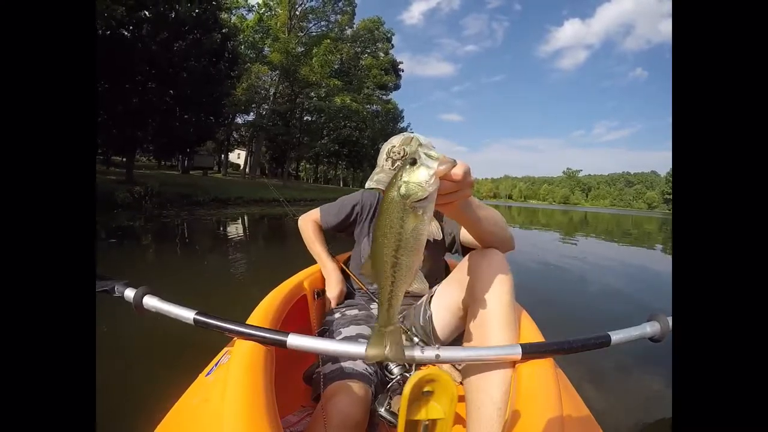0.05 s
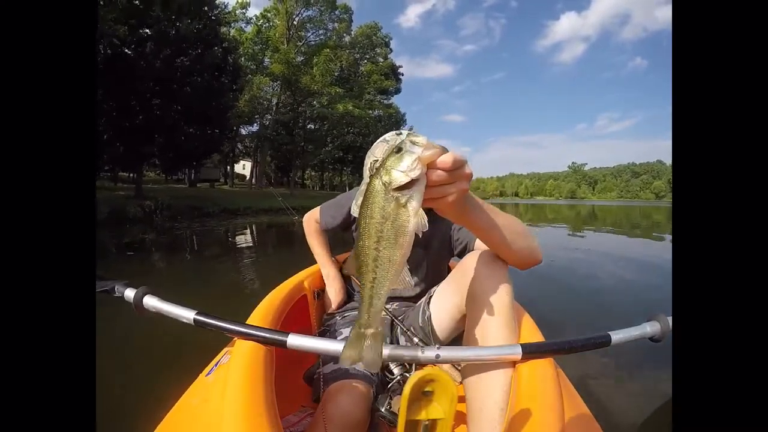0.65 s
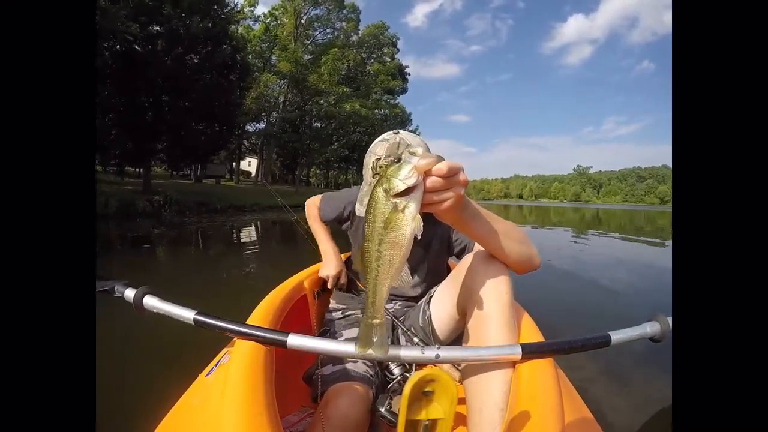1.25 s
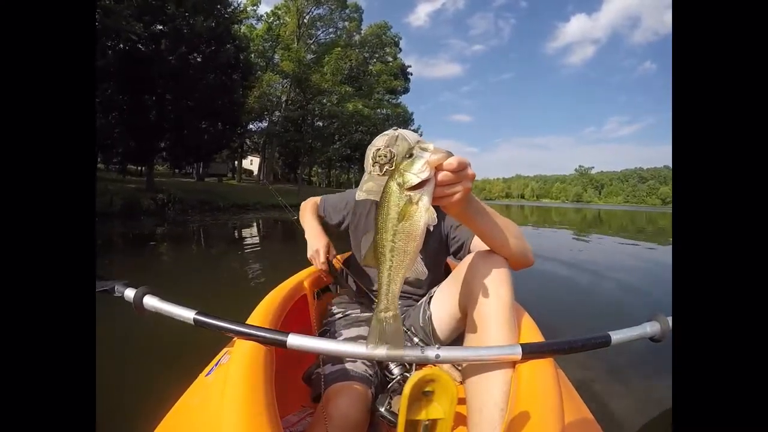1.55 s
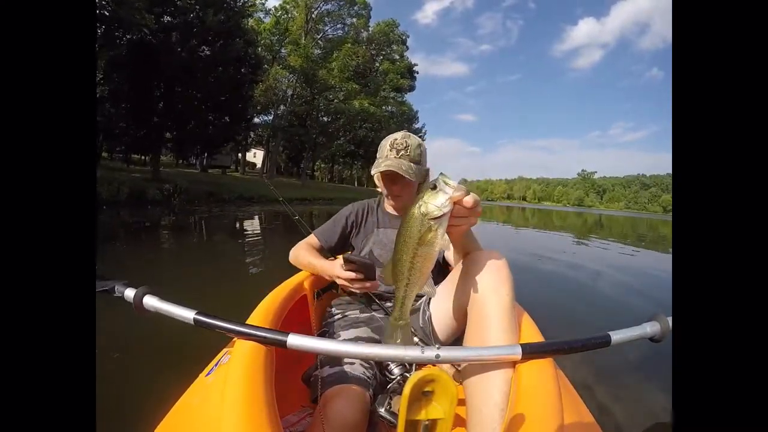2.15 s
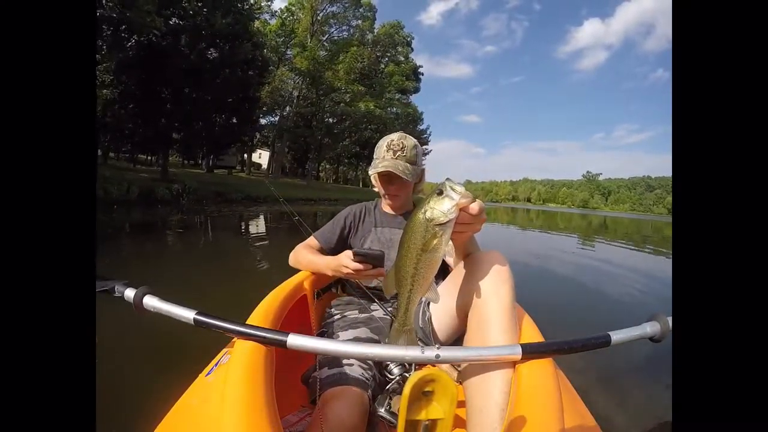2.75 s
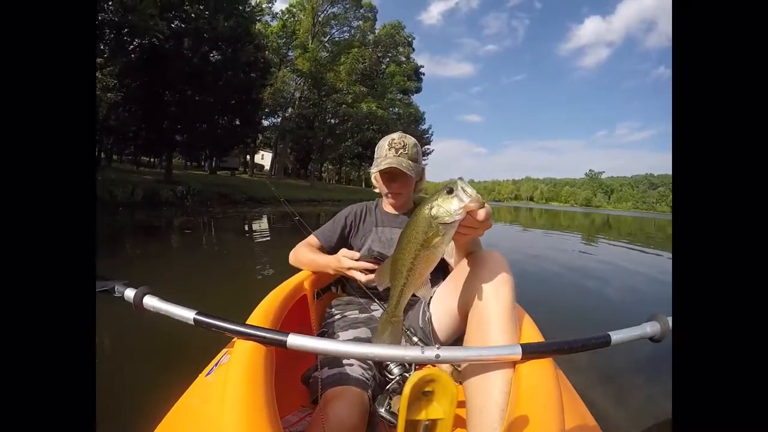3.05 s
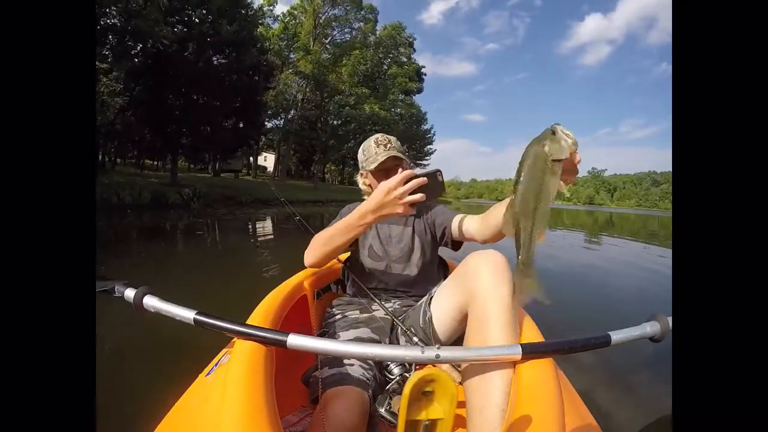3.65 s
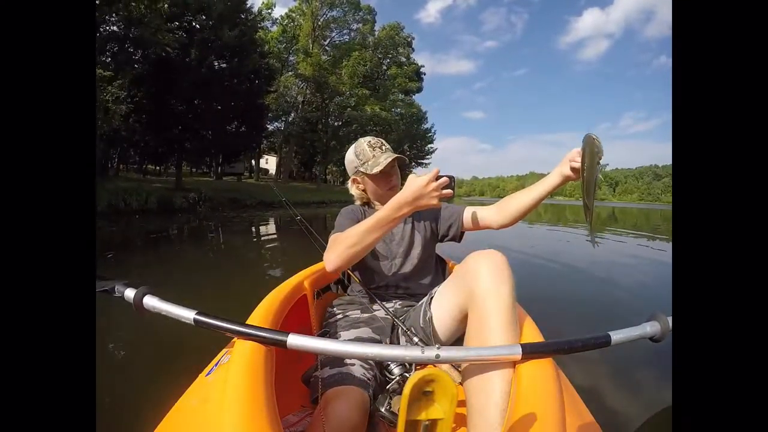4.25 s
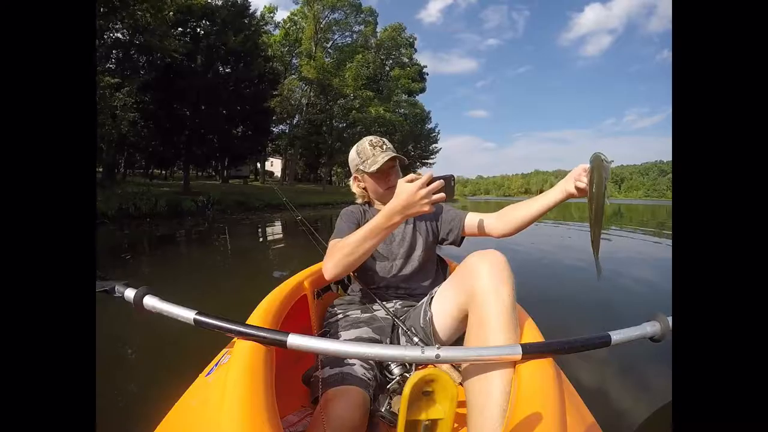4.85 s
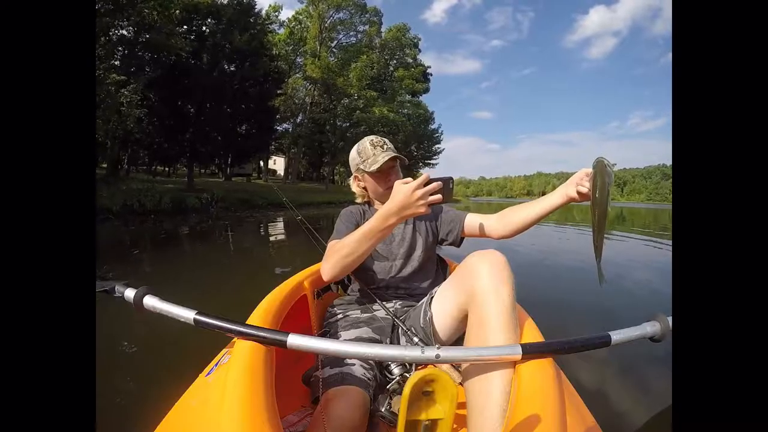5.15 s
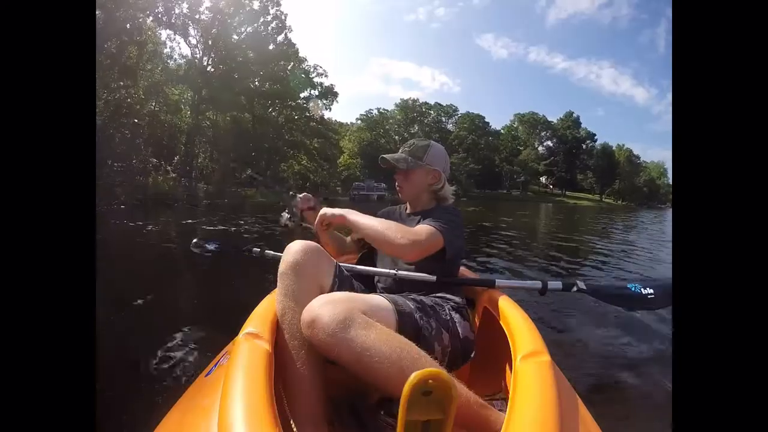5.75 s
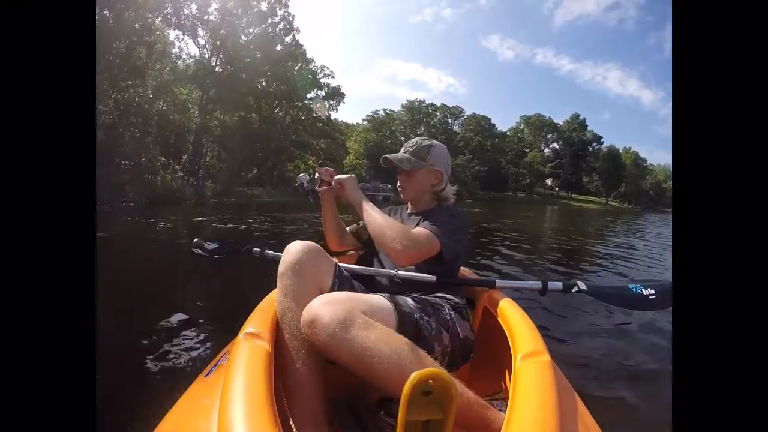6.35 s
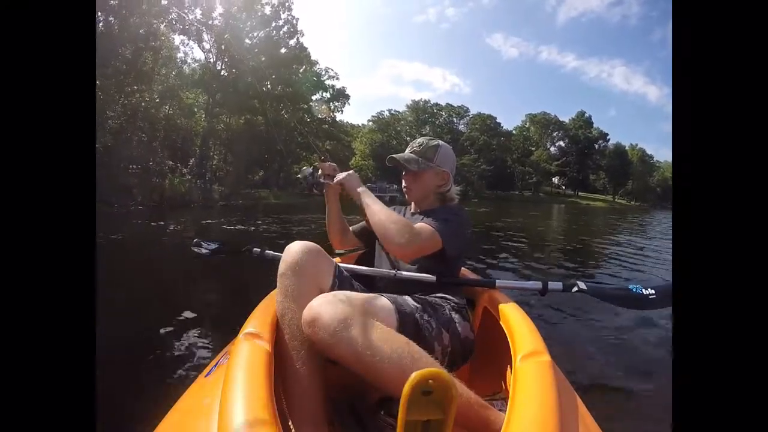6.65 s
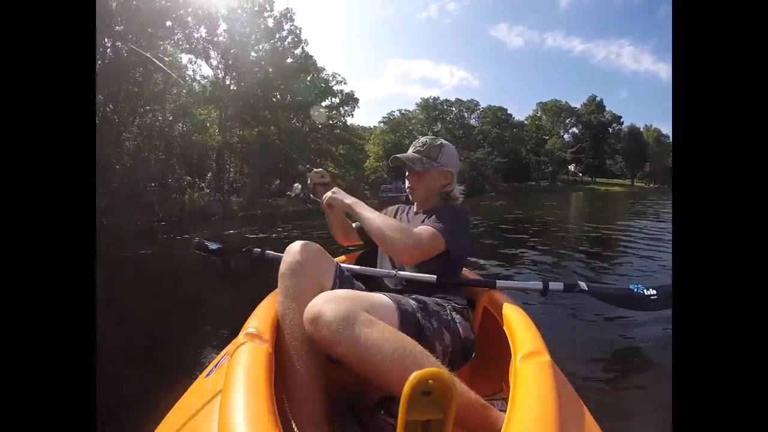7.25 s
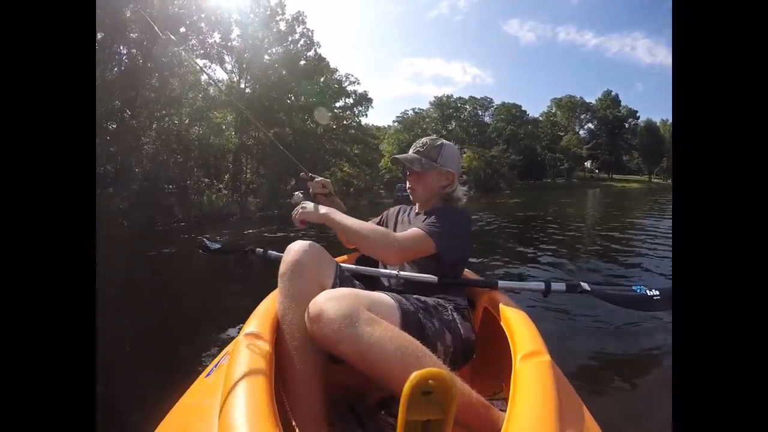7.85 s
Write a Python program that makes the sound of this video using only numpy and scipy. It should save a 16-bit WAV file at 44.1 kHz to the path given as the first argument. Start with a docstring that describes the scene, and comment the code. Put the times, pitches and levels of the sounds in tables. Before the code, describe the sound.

Close by, the seat of a plastic kayak creaks in small clicking slips while fishing gear knocks irregularly on the hollow shell. A microphone fixed to the hull picks up the low rumble of the rocking boat on a pond. After a quieter stretch, distant cicadas grow louder, and a cluster of heavy, booming knocks comes near the end.

```python
"""On a pond, in a plastic kayak, one microphone fixed to the hull. Close by, someone handles a fish and
fishing gear: the seat creaks in small slips and gear knocks on the shell, loudest near the end.
Both reach the microphone as bending waves, which bring the treble first and the boom last.
The rocking boat rumbles underneath and the far shore hisses. There are two scenes: the cicadas on the
shore are faint in the first, then after a cut at 5.6 s they are louder and swelling."""
import sys
import numpy as np
from scipy import signal
from scipy.fft import rfft, irfft, next_fast_len
from scipy.io import wavfile
from scipy.ndimage import uniform_filter1d, minimum_filter1d

SR = 44100
rng = np.random.default_rng(int(sys.argv[2]) if len(sys.argv) > 2 else 0)


def wav_out(sig):
    """Save sig, one row per channel (or a flat mono array), as 16-bit PCM at SR to the path in sys.argv[1]."""
    wavfile.write(sys.argv[1], SR, np.round(np.clip(np.atleast_2d(sig).T, -1, 1) * 32767).astype(np.int16))


N = 357287
TIME = np.arange(N) / SR
HZ = np.fft.rfftfreq(N, 1 / SR)

# registers of the shell, in the order heave, boom, thud, clack, click:
# (low edge [Hz], high edge [Hz], share of scattered waves [0-1], build-up [s], their t60 [s], gain [dB])
REGISTERS = [(18, 65, 0.1, .004, .15, 3), (60, 130, 0.48, 0.0026, 0.12, 3),
             (132, 300, 0.48, 0.0019, 0.21, -0.5), (350, 1215, 0.8, 0.00052, 0.1, -9),
             (1665, 4150, 0.81, 0.00083, 0.028, -5)]
# creaks of the seat, each a scrape with a run of small slips:
# (start [s], length [s], level [dB], swell [dB/s], slip rate [1/s])
CREAKS = [(0.017, 0.18, -49.5, -19, 16.9), (0.272, 0.18, -52.5, -9, 26.7), (0.525, 0.49, -55.5, -5.5, 7.7),
          (1.125, 0.29, -53.5, 4, 22.8), (1.731, 0.08, -57.5, 28, 12), (1.823, 0.22, -51, 17, 54),
          (3.121, 0.14, -62.5, 20, 22), (5.749, 0.16, -62.5, -3, 12.5), (7.52, 0.13, -46, -68.5, 19)]


def amp(db):
    """Decibels to gain."""
    return 10 ** (np.asarray(db) / 20)


def unit_rms(x):
    """Scales to rms 1."""
    return x / np.sqrt(np.mean(x ** 2) + 1e-20)


def add(mix, start_s, sound):
    """Adds a sound into the mix at start_s."""
    part = mix[max(round(start_s * SR), 0):][:len(sound)]
    part += sound[:len(part)]


def noise(gain):
    """Noise of rms 1, shaped by a gain at each frequency of HZ."""
    size = next_fast_len(N)
    gain = np.interp(np.fft.rfftfreq(size, 1 / SR), HZ, gain)
    return unit_rms(irfft(rfft(rng.standard_normal(size)) * gain, size)[:N])


def spectrum(points):
    """Gain at each frequency from points of (frequency [Hz], level [dB])."""
    hz, db = np.transpose(points)
    return amp(np.interp(np.log(HZ + 1), np.log(hz), db))


def resonances(peaks):
    """Gain at each frequency from steep peaks of (centre [Hz], width [Hz], level [dB])."""
    return np.sqrt(sum((amp(db) / (1 + (2 * (HZ - hz) / width) ** 2)) ** 2 for hz, width, db in peaks))


def swell(start, end, rise_s, fall_s):
    """Envelope that rises to 1 at start, holds until end and dies away."""
    return np.exp(-np.maximum(start - TIME, 0) / rise_s - np.maximum(TIME - end, 0) / fall_s)


def hull_rumble(rocking_gain_db=2.5):
    """Under the microphone, water rocks the hull, and the low rumble swells briefly now and then."""
    # slow rocking of the boat: (time [s], level [dB])
    rocking_levels = [(0.0, -41), (0.81, -43.5), (1.06, -31), (1.37, -34), (1.53, -45), (1.76, -46),
                      (1.94, -36.5), (2.75, -53), (3.09, -51), (5.23, -56.5), (5.68, -57.5), (5.82, -47),
                      (6.99, -45.5), (7.45, -33), (7.53, -33), (7.6, -30), (7.81, -45), (8.1, -43)]
    # short swells of low rumble, several the booming tails of knocks: (time of the peak [s], level [dB])
    low_swells = [(0.049, -29.5), (0.45, -32.5), (0.87, -40), (1.3, -26.5), (1.82, -25), (2.0, -43),
                  (3.23, -31), (3.7, -43), (5.7, -35), (6.48, -30), (6.67, -40), (7.1, -19.5), (7.5, -15.5),
                  (7.72, -23)]
    # spectrum of the rumble: (frequency [Hz], level [dB])
    colour = [(10, -54), (18, 0), (35, 0.5), (70, -8), (105, -13.5), (135, -26), (190, -30), (270, -29),
              (380, -45), (650, -73), (1100, -110)]
    rocking = amp(np.interp(TIME, *np.transpose(rocking_levels)) + rocking_gain_db)
    swell_power = sum((amp(db) * swell(s, s, rise_s=0.03, fall_s=0.048)) ** 2 for s, db in low_swells)
    return noise(spectrum(colour)) * np.sqrt(rocking ** 2 + swell_power)


def shore_hiss(level_db=-60.5):
    """Far insects and leaves blend into a steady hiss."""
    # spectrum of the hiss: (frequency [Hz], level [dB])
    colour = [(100, 6), (250, -2.5), (450, -6.5), (800, -9), (1400, -13.5), (2700, -12.5), (6500, -13.5),
              (8500, -21), (13000, -25), (15300, -25)]
    return noise(spectrum(colour)) * amp(level_db)


def cicadas(throb_hz=8.5, speedup_hz_per_s=0.45, pause_at_s=7.793, throb_from_db=-71, deepening=0.87):
    """Across the water, a song throbs ever faster, and deeper when louder, beside a fluttering whine."""
    # cicada level in two scenes, faint, then after a cut at 5.6 s louder and swelling:
    # (time [s], song level [dB], whine level [dB])
    scene_levels = [(0, -68, -72.5), (3.2, -72, -71), (3.6, -74.5, -79), (5.6, -78.5, -90.5),
                    (5.649, -66.5, -73.5), (6.4, -65.5, -67), (8.1, -55.5, -56.5)]
    # resonances of the song and of the whine: (centre [Hz], width [Hz], level [dB])
    song_peaks = [(2600, 320, -2), (3347, 240, 1.5), (3843, 540, 4.5)]
    whine_peaks = [(4107, 95, 4.5), (4860, 600, -8), (5370, 810, -14), (6035, 110, 2), (5850, 690, -7),
                   (6440, 130, -3), (7670, 280, -12), (9700, 740, -23.5)]
    times, *levels = np.transpose(scene_levels)
    song_db, whine_db = (np.interp(TIME, times, level) for level in levels)
    t = TIME - pause_at_s  # the rate passes throb_hz at this pause
    throbs = throb_hz * t + speedup_hz_per_s * t ** 2 / 2
    pause = np.cos(np.pi * throbs) ** 6
    depth_db = deepening * np.maximum(song_db - throb_from_db, 0)
    song = noise(resonances(song_peaks)) * amp(song_db - depth_db * pause)
    whine = noise(resonances(whine_peaks))
    flutter_db = noise(1 / (1 + (HZ / 13) ** 4))  # 1 dB rms, mostly below 13 Hz
    return song + whine * amp(whine_db + flutter_db)


def shell_ring(low_hz, high_hz):
    """The plastic shell's modes ring in one register; the upper registers have steeper edges."""
    # modes of the shell: (frequency [Hz], level [dB], t60 [s])
    hull_modes = [(33.2, -8, 0.74), (48, -3, 0.27), (63.47, -4, 0.15), (68.9, 7.5, 0.63), (77.1, 10, 0.3),
                  (97.5, 1.5, 0.25), (110.4, 0.5, 0.43), (143, -7, 0.32), (168.7, -9.5, 0.44),
                  (203.4, -2, 0.13), (222.2, -12.5, 0.81), (254.3, -2, 0.15), (273.6, -1, 0.17),
                  (293, -4, 0.041), (405, -2, 0.053), (458, -5, 0.19), (562, -1, 0.11), (623, 10, 0.023),
                  (674, -4, 0.14), (773, 10, 0.032), (887, 10.5, 0.026), (1002, 1.5, 0.051),
                  (1105, -15, 0.08), (1333, -9, .06), (1768, -3, 0.053), (1883, 3.5, 0.029),
                  (2038, 6, 0.013), (2100, -17, 0.02), (2715, -8.5, 0.03), (3520, -15, 0.012),
                  (4340, -2.5, 0.0084)]
    modes = [mode for mode in hull_modes if low_hz <= mode[0] < high_hz]
    t = np.arange(int(SR * max(t60 for _, _, t60 in modes))) / SR
    ring = sum(amp(db - 60 * t / t60) * np.sin(2 * np.pi * hz * t) for hz, db, t60 in modes)
    order = 4 if low_hz > 250 else 1
    return signal.sosfilt(signal.butter(order, [low_hz, high_hz], "band", fs=SR, output="sos"), ring)


def seat_scrape(rings, grains_per_s=450, seat_hz=610, seat_t60=0.071):
    """Many tiny slips blur into a scrape through the shell, and the seat pan sings along."""
    pressure = np.zeros(N)
    for start, length, db, db_per_s, _ in CREAKS:
        level = amp(db + db_per_s * np.clip(TIME - start, 0, length))
        pressure += level * swell(start, start + length, rise_s=0.056, fall_s=0.028)
    grains = rng.choice([-1, 1], N) * (rng.random(N) < grains_per_s / SR)
    t = TIME[:SR // 5]
    seat = np.sin(2 * np.pi * seat_hz * t) * amp(-60 * t / seat_t60)
    boom, thud, clack, click = rings[1:]
    blend = [(boom, 4), (thud, -1), (clack, -5), (click, -15), (seat, -9)]  # (ring, level [dB])
    return pressure * sum(amp(db) * unit_rms(signal.oaconvolve(grains, ring)[:N]) for ring, db in blend)


def small_slips(over_db=5.5, hard_db=-1.5, click_hz=2100, jitter=0.029, spread_db=2.5, detune=0.061):
    """In a creak the seat sticks and slips at an almost even rate; gives rows for seat_slips."""
    rows = []
    for start, length, db, db_per_s, per_s in CREAKS:
        s = start
        for late, loud, high in rng.standard_normal(size=(40, 3)):
            if s < start + length:
                clack_db = db + over_db + db_per_s * (s - start) + spread_db * loud
                rows.append((s, clack_db, hard_db, click_hz * np.exp(detune * high)))
            s += np.exp(jitter * late) / per_s
    return rows


def favour(ring, hz, q):
    """The place of contact favours the modes near hz."""
    return signal.lfilter(*signal.iirpeak(hz, q, fs=SR), ring)


def strike(ring, register, db):
    """A direct push and a swelling burst of waves scattered round the shell excite one register."""
    _, _, share, rise_s, t60, gain_db = register
    t = np.arange(SR // 5) / SR
    drive = rng.standard_normal(len(t)) * (1 - np.exp(-t / rise_s)) * amp(-60 * t / t60)
    drive *= share / np.linalg.norm(drive)
    drive[0] += 1 - share  # the direct push
    sound = signal.fftconvolve(drive, ring)
    loudest_rms = np.sqrt(uniform_filter1d(sound ** 2, size=880).max())  # over 20 ms
    return amp(db + gain_db) * sound / loudest_rms


def seat_slips(rings, damping_db_per_s=260, scatter_t60=0.077, spot_t60=0.013):
    """Each slip snaps one spot of plastic and rings the shell, which the sitter's weight damps."""
    # single loud slips: (time [s], clack level [dB], click over clack [dB], click pitch [Hz])
    loud_slips = [(0.0907, -36.5, -4, 2430), (0.16, -36.5, -4, 2160), (0.2112, -42, -0.5, 2130),
                  (0.4329, -49, -7, 1900), (0.4881, -34, 5, 2360), (0.7552, -48, 5.5, 2240),
                  (1.1615, -40, 3, 2140), (1.2225, -40.5, -3.5, 1960), (1.2456, -42, -0.5, 2280),
                  (1.3505, -40.5, -6, 2200), (1.4345, -40, -1.5, 1940), (1.704, -36.5, 3, 1904),
                  (1.8575, -41, -11, 1810), (1.9675, -32.5, -0.5, 1980), (2.0166, -34.5, 0, 1973),
                  (2.0354, -50.5, 12, 1930), (2.0646, -40.5, 0, 2270), (2.1075, -36, 0, 2050),
                  (2.174, -41, -1, 2200), (2.324, -38.5, -2, 2230), (3.154, -37.5, .5, 2250),
                  (5.7462, -54.5, -1, 2260), (6.114, -52, -3, 1840)]
    thud, clack, click = rings[2:]
    thud_register, clack_register, click_register = REGISTERS[2:]
    clack = favour(clack * amp(-damping_db_per_s * TIME[:len(clack)]), hz=674, q=0.77)
    clack_register = (*clack_register[:4], scatter_t60, clack_register[5])
    t = TIME[:len(click)]
    out = np.zeros(N)
    for s, clack_db, hard_db, click_hz in list(loud_slips) + small_slips():
        spot = np.sin(2 * np.pi * click_hz * t) * amp(-60 * t / spot_t60)
        snap = unit_rms(click) * amp(-1) + unit_rms(favour(spot, click_hz, q=3.2))
        add(out, s, strike(snap, click_register, clack_db + hard_db - 2))
        add(out, s, strike(clack, clack_register, clack_db + 4.5))
        add(out, s, strike(thud, thud_register, clack_db - 4))
    return out


def gear_knocks(rings, fall_db_per_octave=10, damping=110):
    """A knock's soft push drives the low registers near its pitch; its hard contact, clack and click."""
    # blows on the hull, where heavy things push at a low pitch: (time [s], push level [dB],
    # push pitch [Hz], clack level [dB], click over clack [dB], clack centre [Hz])
    blows = [(0.701, -29, 300, -48.5, -6.5, 417), (0.839, -13, 118, -37.5, -6, 360),
             (0.903, -13, 40, -51, -7, 382), (1.202, -34, 230, -37, -11, 346),
             (1.363, -28, 158.5, -43, -17, 425), (1.797, -34, 70, -44.5, -41, 554),
             (2.481, -32, 183, -31, -2.5, 744), (2.909, -48, 150, -82, -28, 351),
             (3.209, -33, 163.3, -36, -13, 445), (4.152, -31.5, 238, -30.5, -3, 610),
             (5.675, -30.5, 93, -60, -16, 350), (7.046, -18, 160, -18, -24, 573),
             (7.345, -25.5, 100, -32.5, -18, 408), (7.364, -15.5, 72, -60, -1, 432),
             (7.456, -5.5, 250, -5, -13, 480), (7.464, -2, 154.6, -17, -20, 566),
             (7.51, -17, 240, -18, -18, 429), (7.57, -16, 78, -19, -18, 525),
             (7.626, -19.5, 110, -30, -32, 354)]
    heave, boom, thud, clack, click = rings
    centres_hz = np.array([np.sqrt(low_hz * high_hz) for low_hz, high_hz, *_ in REGISTERS[:3]])
    click = favour(click, hz=1990, q=0.59)
    out = np.zeros(N)
    for s, push_db, push_hz, clack_db, hard_db, clack_hz in blows:
        heave_db, boom_db, thud_db = push_db - fall_db_per_octave * abs(np.log2(centres_hz / push_hz))
        # a heavy blow stays pressed on the wall and shortens its ring
        pressed = thud * amp(-damping * np.sqrt(amp(thud_db)) * TIME[:len(thud)])
        struck = heave, boom, pressed, favour(clack, clack_hz, q=1.0), click
        levels_db = heave_db, boom_db, thud_db, clack_db, clack_db + hard_db
        for ring, register, db in zip(struck, REGISTERS, levels_db):
            add(out, s, strike(ring, register, db))
    return out


def bending_waves(x, trip_at_1khz_s=0.003706, on_time_hz=1900):
    """Bending waves run to the microphone at a speed that grows as the root of frequency."""
    size = next_fast_len(N + SR)
    hz = np.fft.rfftfreq(size, 1 / SR)
    turns = trip_at_1khz_s * np.sqrt(1000) * (2 * np.sqrt(hz) - hz / np.sqrt(on_time_hz))
    return irfft(rfft(x, size) * np.exp(-2j * np.pi * turns), size)[:N]


def scene():
    """At the microphone, in mono: the boat comes through the hull, the far shore through the air."""
    rings = [shell_ring(low_hz, high_hz) for low_hz, high_hz, *_ in REGISTERS]
    background = hull_rumble() + shore_hiss() + cicadas()
    handling = gear_knocks(rings) + seat_scrape(rings) + seat_slips(rings)
    return (background + bending_waves(handling))[None]


def record(dry, ceiling=0.93, edge_hz=15300):
    """A smooth limiter holds down the loudest knock, and a low-pass cuts the top of the treble."""
    needed_gain = np.minimum(1, ceiling / (abs(dry) + 1e-9))
    held_gain = minimum_filter1d(needed_gain, size=801)
    smooth_gain = uniform_filter1d(uniform_filter1d(held_gain, size=401), size=401)
    low_pass = signal.firwin(511, edge_hz, window=("kaiser", 9), fs=SR)
    return signal.oaconvolve(dry * smooth_gain, low_pass[None], "same")


dry = scene()
out = record(dry)
wav_out(out)
```